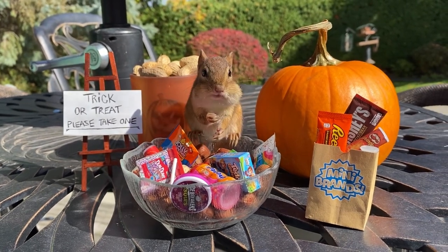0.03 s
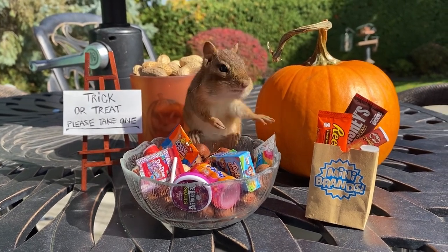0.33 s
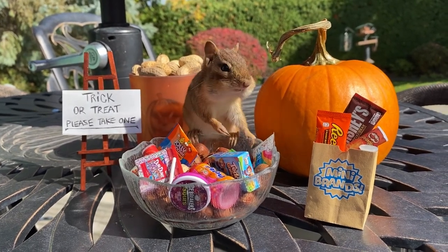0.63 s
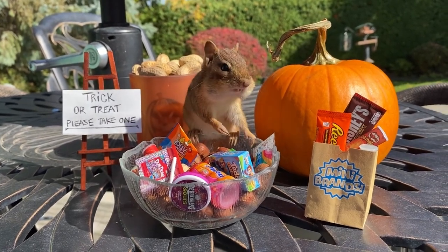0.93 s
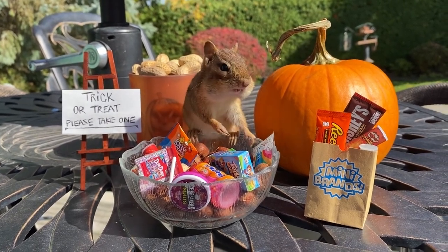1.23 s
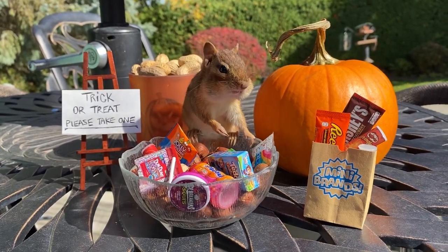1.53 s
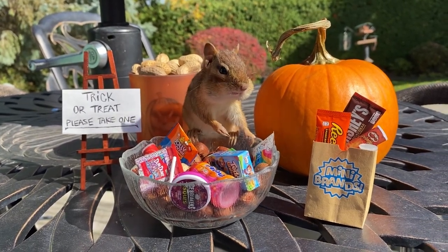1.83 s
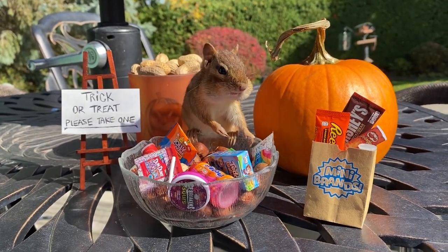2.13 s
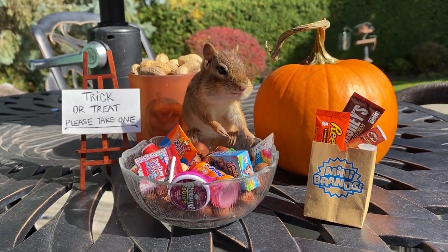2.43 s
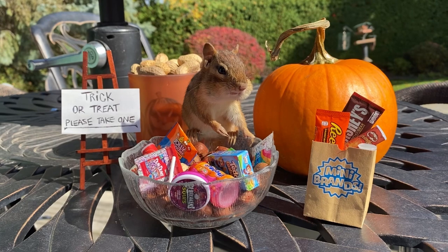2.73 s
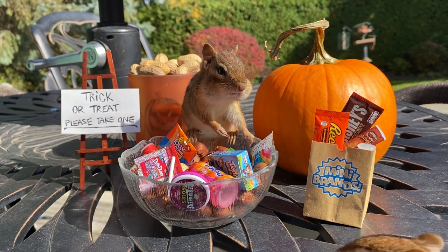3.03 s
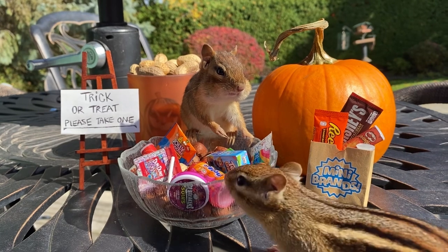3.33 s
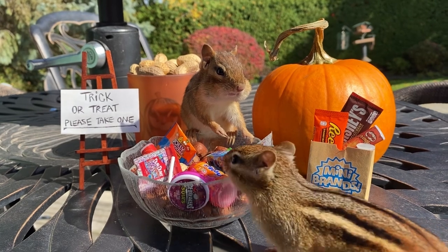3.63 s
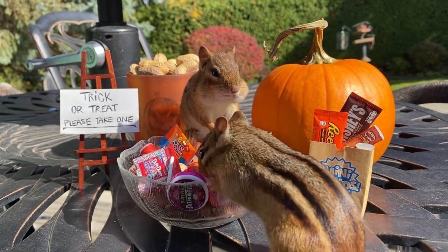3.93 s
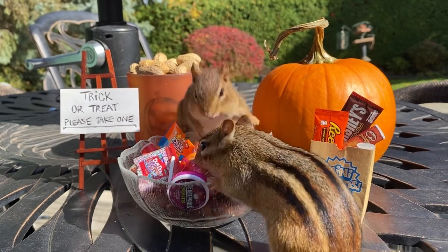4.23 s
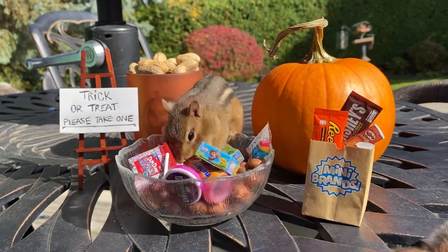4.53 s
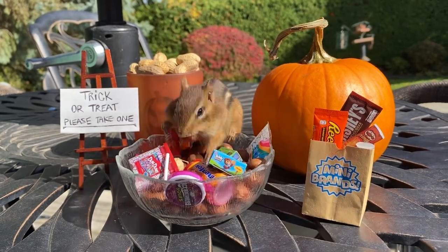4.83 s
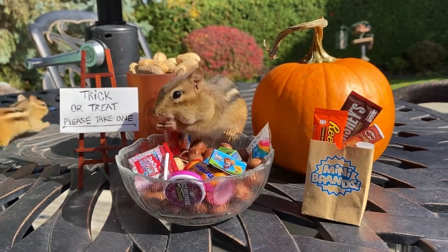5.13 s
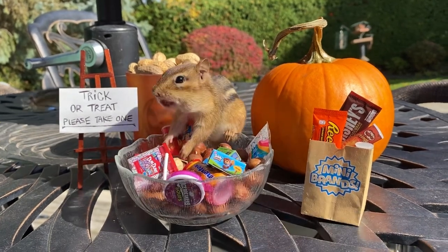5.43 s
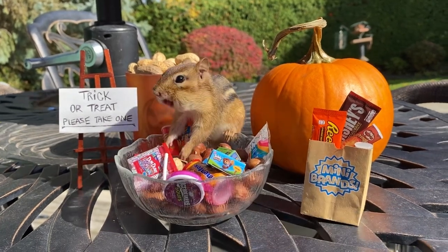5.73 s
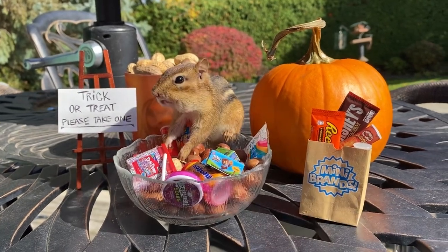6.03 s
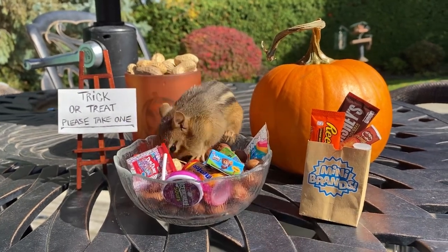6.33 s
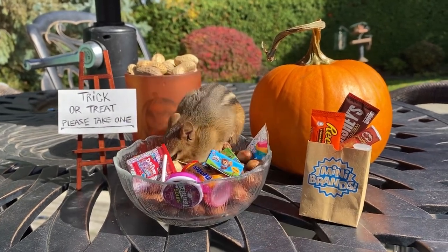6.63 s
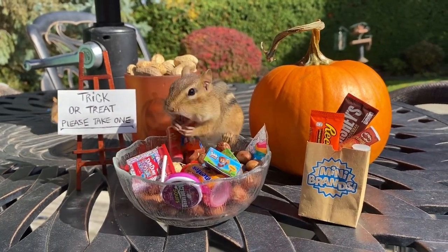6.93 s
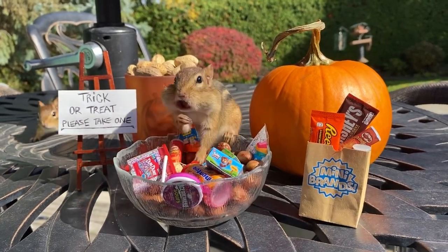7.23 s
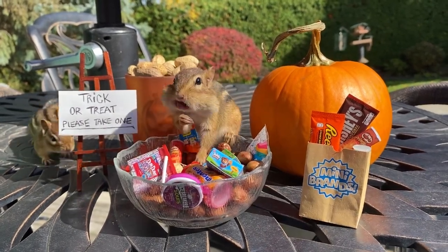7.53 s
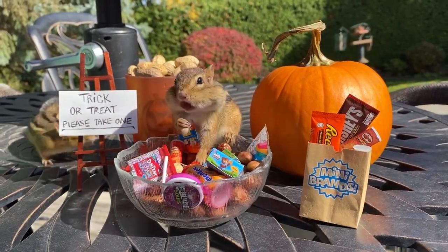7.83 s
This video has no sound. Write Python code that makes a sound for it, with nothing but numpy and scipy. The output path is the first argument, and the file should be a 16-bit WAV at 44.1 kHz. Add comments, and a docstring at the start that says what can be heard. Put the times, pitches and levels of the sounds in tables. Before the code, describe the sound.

A small animal rummages close by in a glass bowl of nuts and wrapped candy on a garden table. First come a single hollow knock and a quiet stretch of distant traffic and engine hum, then a quick run of thudding paws. The bowl suddenly rocks and rings as nuts hit the glass and wrappers crackle. Scattered dry knocks and softer rustles and clicks continue, then die down.

```python
"""A chipmunk rummages in a glass bowl of nuts and wrapped candy on a garden table. Nuts ring the glass
and clack together, wrappers snap, crinkle and slide, the bowl rocks. A second chipmunk scrambles past,
its footfalls thumping the table. Dry, hollow knocks sound nearby, over a far engine drone,
the hush of distant traffic and a faint bird."""
import sys
import numpy as np
from scipy import signal
from scipy.fft import rfft, irfft, next_fast_len
from scipy.io import wavfile
from scipy.ndimage import uniform_filter1d, map_coordinates

SR = 44100
rng = np.random.default_rng(int(sys.argv[2]) if len(sys.argv) > 2 else 0)


def inscribe(sig):
    """Save sig as 16-bit PCM at rate SR to the path in sys.argv[1].

    A 1-D sig is mono; a 2-D sig holds one channel per row.
    Samples are clipped to [-1, 1] before scaling.
    """
    pcm = np.round(np.clip(np.atleast_2d(sig).T, -1, 1) * 32767)
    wavfile.write(sys.argv[1], SR, pcm.astype(np.int16))


N = 352800

# far and near sound: f/Hz, left-right likeness
FAR_LIKENESS = [(60, 0.93), (130, .85), (290, 0.42), (640, 0.74), (1400, 0.71), (2600, 0.36), (7000, 0.2),
                (12000, 0.44)]
NEAR_LIKENESS = [(150, 1), (700, .1), (1400, 0.24), (2400, 0.58), (4400, 0.067), (8000, 0.13),
                 (11500, 0.94)]
# background spectra: f/Hz, level/dB
ENGINE_SPECTRUM = [(20, -19), (35, 4), (55, 11), (75, 10.5), (105, 12.5), (130, -4), (200, -11.5),
                   (400, -49.5)]
TRAFFIC_SPECTRUM = [(76, -30.5), (130, -4), (199, -8), (310, -13), (357, -13), (653, -7.5), (914, -4),
                    (1260, -12), (1530, -15.5), (1820, -22.5), (2510, -27.5), (3330, -34), (6540, -45),
                    (9000, -59), (11700, -88.5), (19800, -120)]
AIR_SPECTRUM = [(1000, -5.5), (3000, -2), (5300, -10.5), (6600, -6), (8300, -21.5), (13000, -24.5),
                (14500, -39.5)]
# background level curves: t/s, level/dB
RUMBLE_LEVEL = [(0, -50.5), (2.4, -53.5), (3.4, -52.5), (4, -63.5), (4.6, -54), (8, -54)]
TRAFFIC_LEVEL = [(0, -50.5), (2.7, -49), (4.15, -54), (5.3, -46.5), (5.8, -50.5), (6.5, -50), (7.2, -52.5),
                 (8, -54.5)]
# wrapper creases snapping: t/s, level/dB
SNAPS = [(0.073, -45), (3.686, -50), (4.1675, -49), (4.178, -42), (4.2874, -26), (4.3035, -21),
         (4.326, -33), (4.4025, -22.5), (4.523, -42), (4.6034, -25), (4.6489, -30), (4.8564, -38.5),
         (5.043, -34.5), (5.4094, -37), (6.136, -29), (6.1619, -19.5), (6.286, -43), (6.2924, -39),
         (6.4078, -41), (6.4954, -39), (6.5027, -44), (6.8754, -31), (6.882, -39.5), (7.573, -56)]
# strokes of fur and paws: t/s, level/dB, f/Hz
BRUSHES = [(0.086, -66.5, 7900), (0.962, -63, 3700), (1.325, -76, 11010), (2.544, -62.5, 3400),
           (3.715, -64, 4035), (4.076, -74, 6500), (7.176, -72, 11000), (7.43, -63, 3600)]
# dry knocks: t/s, level/dB
KNOCKS = [(0.2748, -21), (4.5682, -25), (5.014, -29.5), (5.082, -35), (5.2497, -18.5), (6.2375, -14.5),
          (6.3733, -22.5), (7.1001, -27.5)]
# knocked object's modes: f/Hz, level/dB, t60/s
HOLLOW_MODES = [(345.3, -23.5, .22), (1216, -35, 0.15), (1820, -36, 0.12), (2660, -31, 0.11),
                (3300, -19, 0.069), (4890, -24, .05)]
# knock scatter spectrum: f/Hz, level/dB
SCATTER_SPECTRUM = [(110, -22), (220, -6.5), (340, -3), (430, -6), (650, -4), (790, -11.5), (1100, -6),
                    (1850, -8.5), (3300, -11), (3900, -16.5), (4850, -18), (5500, -22.5), (7400, -31),
                    (13000, -46.5)]
# knock scatter decay: f/Hz, t60/s
SCATTER_DECAY = [(200, 0.19), (1000, 0.29), (2800, .15), (5000, 0.094), (10000, .08)]
# footfalls: t/s, level/dB
STEPS = [(2.636, -41.5), (2.673, -38.5), (2.786, -44.5), (3.003, -34.5), (3.075, -30), (3.103, -21.5),
         (3.187, -28.5), (3.225, -28.5), (3.263, -33.5), (3.398, -37.5), (3.45, -32), (3.494, -30.5),
         (3.584, -41.5)]
# table modes: ratio to pitch, level/dB, t60/s
TABLE_MODES = [(.58, -10, .1), (1, 8.5, .13), (1.55, 1.5, .08), (2.4, -4, 0.069), (3.5, -14, 0.085),
               (4.9, -24, .1)]
# bird calls: t/s, start f/Hz
BIRD_CALLS = [(3.87, 7800), (3.935, 7840), (4.05, 8800), (4.116, 8500)]
# nuts striking glass: t/s, high ring level/dB, low ring re high/dB
CLINKS = [(4.0521, -56, -5), (4.195, -52, -7), (4.3027, -9.5, -18), (4.306, -21.5, -3),
          (4.3648, -37.5, 7.5), (4.374, -38, -2), (4.3869, -31.5, 1.5), (4.415, -33.5, -2),
          (4.4257, -30.5, -11), (4.4676, -35.5, -3.5), (4.6028, -13.5, -15), (4.6508, -29.5, -7),
          (4.6785, -31.5, -13), (4.6969, -39.5, -2.5), (4.739, -50.5, 6), (6.136, -44, -14.5),
          (6.4729, -47.5, 2), (6.4884, -44, -2.5), (6.7862, -35.5, -3), (6.8227, -48.5, 0)]
# bowl modes, some in close pairs: f/Hz, level/dB, free t60/s
GLASS_MODES = [(2435, -1, 0.12), (2380, -10.5, 0.044), (4180, -0.5, .055), (4284, -3, 0.1),
               (6416, -3, .032), (6476, 3, 0.045), (6600, -4.5, 0.021), (9020, -14.5, 0.04),
               (11900, -22, .03), (13390, -23.5, .03)]
# digging bouts: t/s, hold/s, scrape level/dB, crinkle level/dB
DIGS = [(4.175, 0.11, -57.5, -79), (4.281, .13, -41, -54.5), (4.527, 0.15, -51, -68),
        (4.744, 0.54, -62, -82), (6.146, 0.033, -51, -67), (6.299, 0.028, -59, -68),
        (6.44, 0.067, -54.5, -72.5), (6.58, 0.6, -68, -85), (6.779, 0.21, -63, -74)]
# wrapper resonances: f/Hz, width/Hz, level/dB
FOIL_MODES = [(3110, 85, 2), (3940, 120, 2), (4870, 100, 3), (6100, 100, -2), (6600, 39, 0),
              (8660, 110, -11), (9180, 67, -17), (9860, 32, 0), (11900, 41, 1), (12400, 47, -10),
              (12900, 35, -7), (13700, 76, -11)]
# nuts and candy colliding: t/s, level/dB, f/Hz
CLACKS = [(4.18, -39.5, 1480), (4.197, -37.5, 1590), (4.2852, -22, 2200), (4.3024, -9.5, 6840),
          (4.3054, -9.5, 6900), (4.3062, -16.5, 1890), (4.33, -29, 5800), (4.3645, -26, 2950),
          (4.379, -29, 1300), (4.402, -24, 7600), (4.421, -31, 5640), (4.5265, -23.5, 1300),
          (4.526, -29, 6240), (4.6035, -23.5, 6400), (5.155, -43.5, 3730), (6.1615, -26.5, 6600),
          (6.163, -30, 1420), (6.522, -39, 3300), (6.68, -42.5, 3020), (6.94, -47, 2180),
          (6.9931, -27.5, 2340)]
# modes of the bowl rocking on the table: f/Hz, level/dB, t60/s
ROCK_MODES = [(346.6, -40.5, .16), (425, -38, .17), (673, -34.5, .13), (1015, -22.5, 0.096),
              (1380, -31.5, .07), (2134, -27, 0.046)]
# wrapper and shell spectra: f/Hz, level/dB
SNAP_SPECTRUM = [(500, -13), (2000, -5), (6500, 4.5), (10000, -6), (12500, 1), (16000, 3)]
CRINKLE_SPECTRUM = [(2000, -24), (4000, -9.5), (6500, 3), (10000, -2.5), (13000, 1), (16000, -9)]
SLIDE_SPECTRUM = [(1500, -15), (2600, -6), (3100, -5), (5000, -4), (8000, -6), (13000, -10), (16000, -9)]
SCRAPE_SPECTRUM = [(200, -7.5), (600, -1.5), (1400, 1), (2800, -9.5), (5000, -14.5), (9000, -31.5)]
CHATTER_SPECTRUM = [(400, -12.5), (1300, 0), (3000, 0), (7000, -5.5), (9000, -8), (10300, -18.5),
                    (13000, -14.5), (16000, -20)]
# microphone port response: f/Hz, level/dB
PORT_RESPONSE = [(8500, 0), (9300, -1), (10100, -4.5), (11500, -0.5), (14000, -1), (15500, -2.5)]


def amp(db):
    """dB to gain."""
    return 10 ** (np.asarray(db) / 20)


def unit(x):
    """Scale to rms 1."""
    return x / np.sqrt(np.mean(x ** 2) + 1e-20)


def along(points, hz):
    """Interpolate (f/Hz, value) points on a log axis."""
    f, v = np.transpose(points)
    return np.interp(np.log(hz + 1), np.log(f), v)


def level(rows):
    """Gain per sample from a (t/s, level/dB) curve."""
    return amp(np.interp(np.arange(N) / SR, *np.transpose(rows)))


def wobble(rate_hz):
    """Smooth random curve, rate_hz knots a second."""
    knots = rng.standard_normal(int(N * rate_hz / SR) + 4)
    return map_coordinates(knots, [np.arange(N) * rate_hz / SR])


def fade(t, t60_s):
    """Exponential decay."""
    return np.exp(-np.log(1000) * t / t60_s)


def swell(start_s, hold_s, attack_s, release_s):
    """Rise until start_s, hold, fall; attack and release span 60 dB."""
    t = np.arange(N) / SR - start_s
    return fade(np.maximum(-t, 0), attack_s) * fade(np.maximum(t - hold_s, 0), release_s)


def filtered(x, response):
    """Apply a frequency response."""
    n = x.shape[-1]
    m = next_fast_len(n + 4096)
    return irfft(rfft(x, m) * response(np.fft.rfftfreq(m, 1 / SR)), m)[..., :n]


def coloured(x, spectrum):
    """Apply a (f/Hz, level/dB) spectrum; rms 1."""
    return unit(filtered(x, lambda hz: amp(along(spectrum, hz))))


def resonance(hz, centre_hz, q):
    """Response of one damped resonance."""
    return 1j * hz * centre_hz / q / (centre_hz ** 2 - hz ** 2 + 1j * hz * centre_hz / q)


def ringing(t, modes, jitter_rad):
    """Decaying modes, phase jittered per channel."""
    return sum(amp(db) * fade(t, t60_s) * np.sin(2 * np.pi * hz * t + rng.normal(0, jitter_rad, (2, 1)))
               for hz, db, t60_s in modes)


def noise(size, likeness):
    """White stereo noise with the given left-right likeness."""
    def blend(hz):
        angle = np.arccos(np.clip(along(likeness, hz), -1, 1)) / 2
        return np.array([np.cos(angle), np.sin(angle)])
    mid, side = filtered(rng.standard_normal((2, size)), blend)
    return np.array([mid + side, mid - side])


def grains(rate_hz, scatter_db, bed, decay_s=.00073):
    """Tiny uneven contacts in clumps, on a bed of friction noise."""
    clumps_db = 3 * wobble(70)
    onsets = rng.random(N) < rate_hz / SR
    hits = onsets * amp(clumps_db + scatter_db * np.clip(rng.standard_normal(N), -2, 2))
    energy = signal.lfilter([1], [1, -np.exp(-1 / (decay_s * SR))], hits ** 2)
    return noise(N, NEAR_LIKENESS) * np.sqrt(energy / energy.mean() + bed ** 2)


def delay_left(pair, lag_s):
    """Left channel trails the right by lag_s."""
    return filtered(pair, lambda hz: np.exp(1j * np.pi * hz * lag_s * np.array([[-1], [1]])))


def add(track, at_s, sound):
    """Mix a sound into the track."""
    start = round(at_s * SR)
    sound = sound[..., max(-start, 0):]
    part = track[:, max(start, 0):][:, :sound.shape[-1]]
    part += sound[..., :part.shape[1]]


def engine(firing_hz=81.2, sag_hz_per_s=2.6, leaves_s=3, fade_db_per_s=32):
    """A far engine's firing tone sags and fades as it draws away; rumble stays."""
    t = np.arange(N) / SR
    pitch_hz = firing_hz - sag_hz_per_s * t + .5 * wobble(6)
    tone_db = -52 - fade_db_per_s * np.maximum(t - leaves_s, 0)
    throb_db = 2.2 * wobble(14)
    tone = np.sqrt(2) * amp(tone_db + throb_db) * np.sin(2 * np.pi * np.cumsum(pitch_hz) / SR)
    rumble = level(RUMBLE_LEVEL) * coloured(noise(N, FAR_LIKENESS), ENGINE_SPECTRUM)
    return tone + rumble


def traffic(gain_db=1):
    """Distant traffic swells and ebbs."""
    gain = amp(gain_db + .4 * wobble(2.4)) * level(TRAFFIC_LEVEL)
    return gain * coloured(noise(N, FAR_LIKENESS), TRAFFIC_SPECTRUM)


def air(level_db=-73):
    """Faint, steady hiss."""
    return amp(level_db) * coloured(noise(N, FAR_LIKENESS), AIR_SPECTRUM)


def snaps(gain_db=-1, rise_s=.0005, tick_t60_s=.007, shiver_t60_s=.035, shiver_db=-22):
    """A crease flips with a bright tick; the wrapper shivers briefly."""
    out, t = np.zeros((2, N)), np.arange(SR // 12) / SR
    envelope = (fade(t, tick_t60_s) + amp(shiver_db) * fade(t, shiver_t60_s)) * (1 - np.exp(-t / rise_s))
    for at_s, db in SNAPS:
        tick = filtered(noise(len(t), NEAR_LIKENESS), lambda hz: amp(along(SNAP_SPECTRUM, hz)))
        add(out, at_s, amp(db + gain_db) * tick * envelope)
    return out


def brushes(half_length_s=.031, q=1.1):
    """Fur and claws graze the wrappers in soft, gritty swells."""
    out, t = np.zeros((2, N)), np.arange(SR // 2) / SR
    grit = grains(rate_hz=500, scatter_db=2, bed=.8)
    envelope = np.exp(-((t - t.mean()) / half_length_s) ** 2)
    for at_s, db, pitch_hz in BRUSHES:
        stroke = grit[:, round(at_s * SR):][:, :len(t)]
        hiss = unit(filtered(stroke, lambda hz: resonance(hz, pitch_hz, q) ** 2))
        add(out, at_s - t.mean(), amp(db) * hiss * envelope)
    return out


def knocks(low_hz=900, high_hz=3700, leak=.021, pulse_db=1.5, tail_db=-14):
    """A sharp pressure pulse, a short hollow ring, then dense scatter from the surroundings."""
    out, t = np.zeros((2, N)), np.arange(SR // 3) / SR
    surroundings = noise(len(t), NEAR_LIKENESS)  # common to all knocks
    blow = signal.lfilter(*signal.butter(1, low_hz, 'high', fs=SR), t == 0)
    pulse = signal.sosfilt(signal.butter(8, high_hz, fs=SR, output='sos'), blow)
    pulse += leak * signal.lfilter(*signal.butter(1, high_hz, fs=SR), blow)
    pulse = amp(pulse_db) * delay_left(np.array([pulse, pulse]) / np.abs(pulse).max(), lag_s=-.00006)
    ring = ringing(t, HOLLOW_MODES, jitter_rad=.69)
    build_up = 1 - fade(t, t60_s=.005)
    for at_s, db in KNOCKS:
        scatter = coloured(surroundings + .5 * noise(len(t), NEAR_LIKENESS), SCATTER_SPECTRUM)
        hz, age_s, bands = signal.stft(scatter, SR, nperseg=256)
        bands *= fade(age_s, along(SCATTER_DECAY, hz)[:, None])
        tail = signal.istft(bands, SR, nperseg=256)[1][:, :len(t)]
        add(out, at_s, amp(db) * (pulse + build_up * (ring + amp(tail_db) * tail)))
    return out


def steps(gain_db=6, rise_s=.014, full_step_hz=71.2, toe_db=-36, toe_hz_per_db=4.5):
    """Soft footfalls shake the table; touches below toe_db sound higher."""
    out, t = np.zeros((2, N)), np.arange(SR // 2) / SR
    attack = 1 - np.exp(-(t / rise_s) ** 2)
    for at_s, db in STEPS:
        pitch_hz = full_step_hz + toe_hz_per_db * max(toe_db - db, 0)
        phases = rng.uniform(0, 2 * np.pi, (len(TABLE_MODES), 1, 1))
        phases = phases + rng.normal(0, .36, (len(TABLE_MODES), 2, 1))
        thump = sum(amp(mode_db) * fade(t, t60_s) * np.sin(2 * np.pi * ratio * pitch_hz * t + phase)
                    for (ratio, mode_db, t60_s), phase in zip(TABLE_MODES, phases))
        add(out, at_s, amp(db + gain_db) * thump * attack)
    return out


def bird(gain_db=-77, length_s=.044, fall_hz=550):
    """Short, very high falling whistles, blurred by the hedge."""
    out, progress = np.zeros((2, N)), np.linspace(0, 1, int(length_s * SR))
    for at_s, start_hz in BIRD_CALLS:
        phase = 2 * np.pi * np.cumsum(start_hz - fall_hz * progress) / SR
        whistle = np.sin(np.pi * progress) * np.sin(phase)
        blur = unit(uniform_filter1d(rng.standard_normal((2, len(progress))), size=100, axis=1))
        add(out, at_s, amp(gain_db) * whistle * (.4 + .93 * blur))
    return out


def clinks(gain_db=-4, contact_s=.00066, spread_rad=.56, t60_share=.82):
    """Nuts ring the bowl; the landing spot sets the mode mix, candy leaning on the glass damps it."""
    out, t = np.zeros((2, N)), np.arange(SR // 4) / SR
    hz, mode_db, free_t60_s = np.transpose(GLASS_MODES)[:, :, None]
    port_phase = np.multiply.outer([-1, 1], spread_rad * (hz < 10000))
    for at_s, db, low_db in CLINKS:
        mix_db = along([(2450, low_db + 4), (4250, .65 * low_db + 2), (6400, 0)], hz)
        strength = amp(db + gain_db + mode_db + mix_db + rng.normal(0, 1, hz.shape))
        phase = rng.uniform(0, 2 * np.pi, hz.shape) + port_phase
        loaded_hz = hz * (1 + rng.normal(0, .003, hz.shape))
        modes = strength * fade(t, free_t60_s * t60_share) * np.sin(2 * np.pi * loaded_hz * t + phase)
        add(out, at_s, modes.sum(axis=1) * (1 - np.exp(-t / contact_s)))
    return out


def scuffs(gain_db=-13, t60_s=.042):
    """Each nut skids and chatters against its neighbours as it meets the glass."""
    out, t = np.zeros((2, N)), np.arange(SR // 8) / SR
    chatter = coloured(grains(rate_hz=970, scatter_db=6, bed=.34), CHATTER_SPECTRUM)
    for at_s, db, low_db in CLINKS:
        skid = chatter[:, round(at_s * SR):][:, :len(t)]
        add(out, at_s, amp(gain_db + db + max(low_db + 3, -8)) * skid * fade(t, t60_s))
    return out


def foil_ring(drive, q_scale=1):
    """Friction excites the wrapper's resonances; rms 1."""
    return unit(filtered(drive, lambda hz: sum(amp(db) * resonance(hz, f, q_scale * f / width_hz)
                                               for f, width_hz, db in FOIL_MODES)))


def glass_ring(drive, q=70, tilt_db_per_oct=-7):
    """Soft rubbing rings the bowl, favouring its lowest modes; rms 1."""
    def response(hz):
        return sum(amp(db + tilt_db_per_oct * np.log2(f / GLASS_MODES[0][0])) * resonance(hz, f, q)
                   for f, db, _ in GLASS_MODES)
    return unit(filtered(drive, response))


def rummage(foil_db=-4, glass_db=-9, uneven_db=3, paw_rate_hz=30):
    """Paws stir the candy: wrappers crinkle in fits, shells scrape the glass."""
    scrape = crinkle = 0
    for at_s, hold_s, scrape_db, crinkle_db in DIGS:
        effort = swell(at_s, hold_s, attack_s=.04, release_s=.39)
        scrape += amp(scrape_db) * effort
        crinkle += amp(crinkle_db) * effort
    creases = grains(rate_hz=400, scatter_db=3.5, bed=.45) * amp(uneven_db * wobble(paw_rate_hz))
    wrappers = coloured(creases, CRINKLE_SPECTRUM) + amp(foil_db) * foil_ring(creases)
    rubbing = grains(rate_hz=370, scatter_db=2, bed=.3)
    shells = coloured(rubbing, SCRAPE_SPECTRUM) + amp(glass_db) * glass_ring(rubbing)
    return crinkle * wrappers + scrape * shells


def clacks(gain_db=-6, t60_at_1khz_s=.046):
    """Shells collide: a burst in one broad resonance, sharper and shorter for small hard candy."""
    out, t = np.zeros((2, N)), np.arange(SR // 8) / SR
    for at_s, db, pitch_hz in CLACKS:
        decay = fade(t, t60_at_1khz_s / (pitch_hz / 1000) ** .65)
        q = 2 * (pitch_hz / 3700) ** .75
        shell = filtered(noise(len(t), NEAR_LIKENESS) * decay, lambda hz: resonance(hz, pitch_hz, q) ** 2)
        add(out, at_s, amp(db + gain_db) * unit(shell) * np.sqrt(np.mean(decay ** 2)))
    return out


def bowl_rock(at_s=4.3035, rise_s=.00061, gain_db=-1):
    """The animal's weight tips the bowl against the table."""
    out, t = np.zeros((2, N)), np.arange(SR // 3) / SR
    ring = ringing(t, ROCK_MODES, jitter_rad=.36)
    add(out, at_s, amp(gain_db) * ring * (1 - np.exp(-t / rise_s)))
    return out


def slide(at_s=4.912, attack_s=.066, drag_db=-44.5, jerk_db=-41.5, ring_db=-5, hiss_db=-2):
    """A wrapper sticks and slips under the paws, rasping in its own resonances."""
    slips = grains(rate_hz=1200, scatter_db=7, bed=.82)
    rasp = amp(ring_db) * foil_ring(slips, q_scale=1.7) + amp(hiss_db) * coloured(slips, SLIDE_SPECTRUM)
    drag = amp(drag_db) * swell(at_s, hold_s=.07, attack_s=attack_s, release_s=.2)
    jerk = amp(jerk_db) * swell(at_s, hold_s=.0081, attack_s=attack_s, release_s=attack_s)
    return (drag + jerk) * rasp


def scene(pan_db=1):
    """Bowl, knocks and background lie to the right; steps and bird are centred."""
    near = clinks() + scuffs() + bowl_rock() + clacks() + snaps() + knocks()
    near += rummage() + slide() + brushes()
    centre = steps() + bird()
    background = delay_left(engine() + traffic() + air(), lag_s=.00043)
    return near * amp([[-pan_db], [pan_db]]) + centre + background


def record(dry, cutoff_hz=15900):
    """Microphone ports colour the treble; a steep low-pass limits the band."""
    heard = filtered(dry, lambda hz: amp(along(PORT_RESPONSE, hz)))
    return filtered(heard, lambda hz: 1 / (1 + (hz / cutoff_hz) ** 120))


dry = scene()
out = record(dry)
inscribe(out)
```